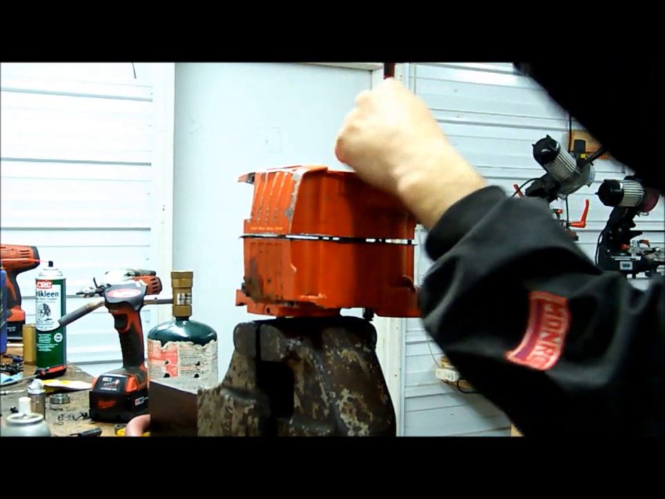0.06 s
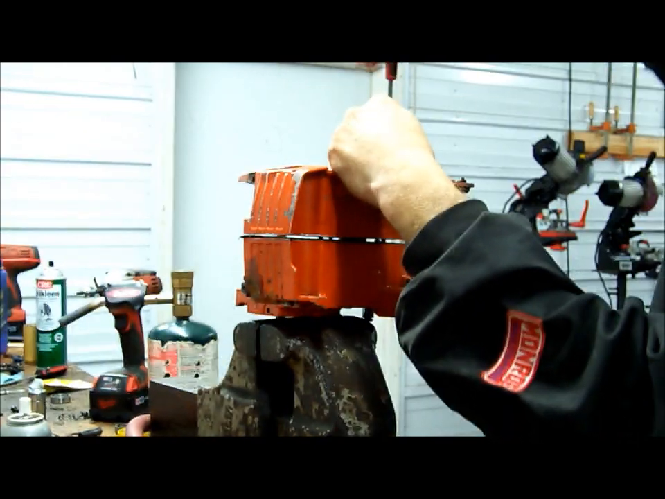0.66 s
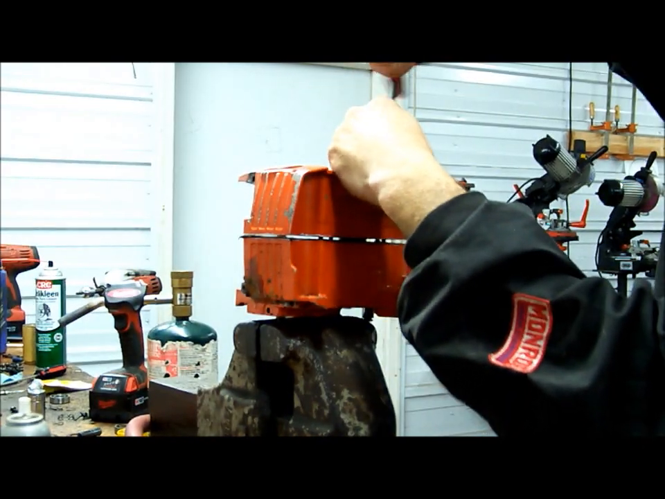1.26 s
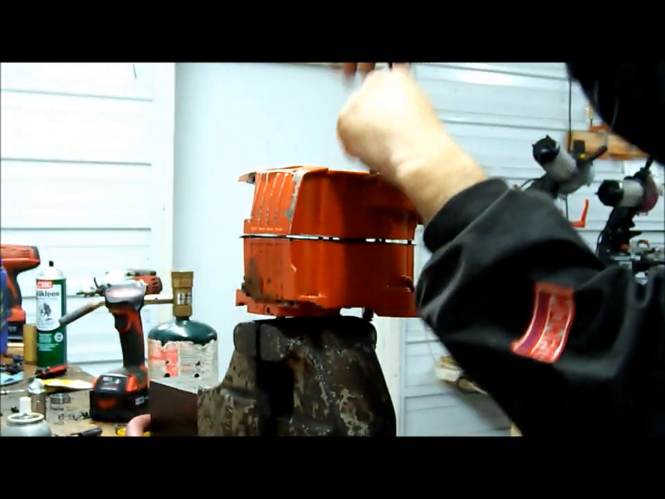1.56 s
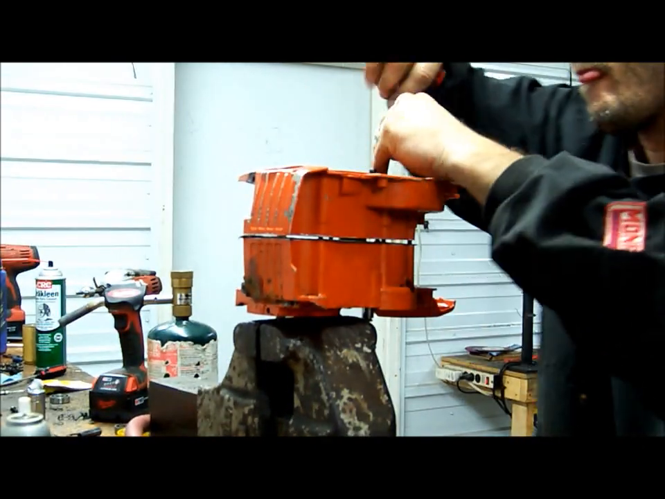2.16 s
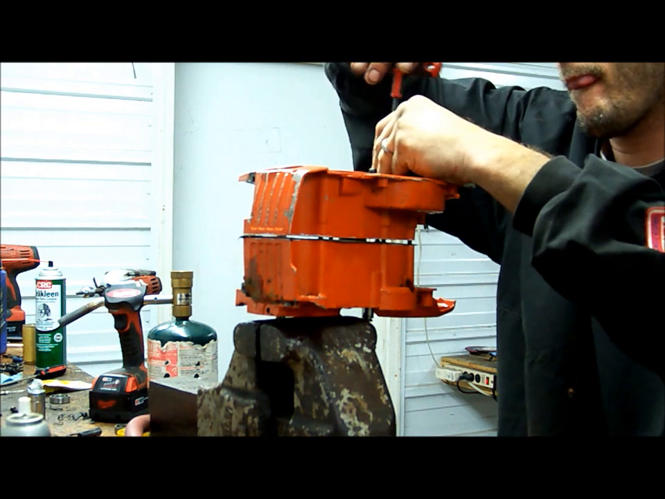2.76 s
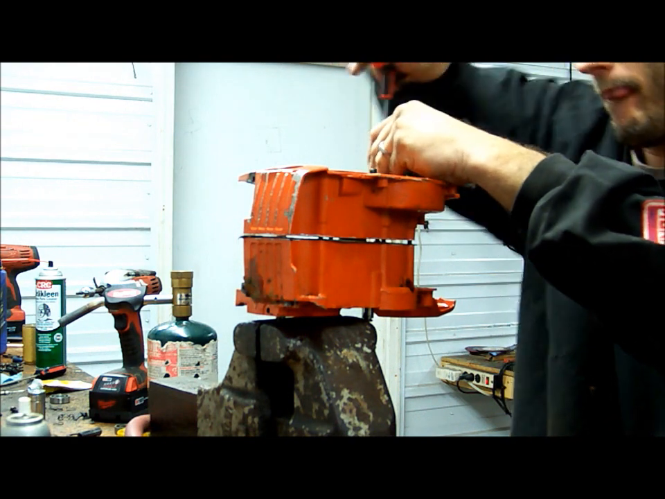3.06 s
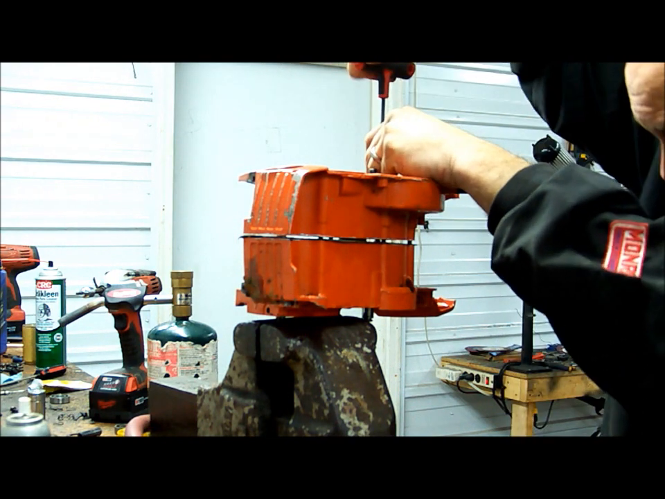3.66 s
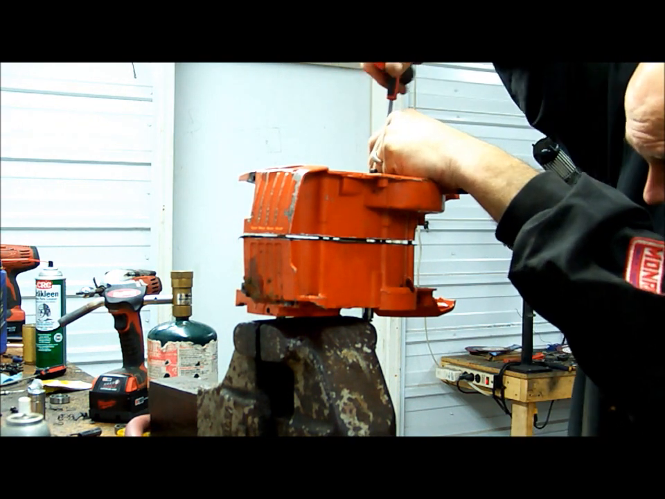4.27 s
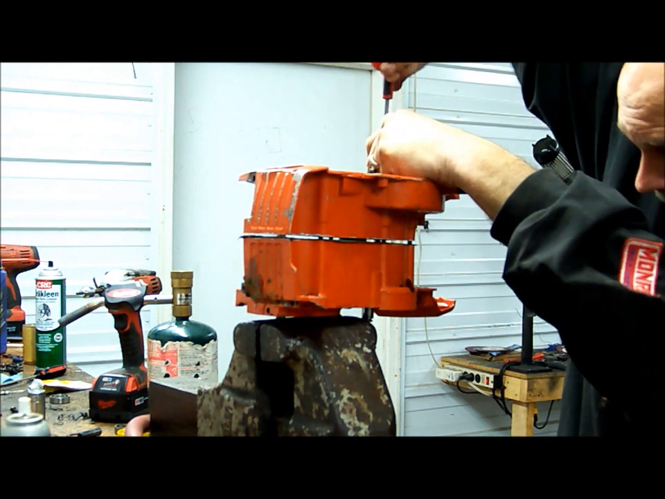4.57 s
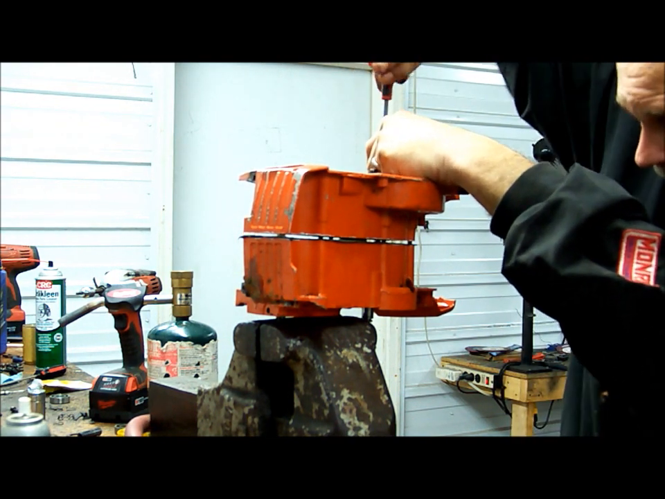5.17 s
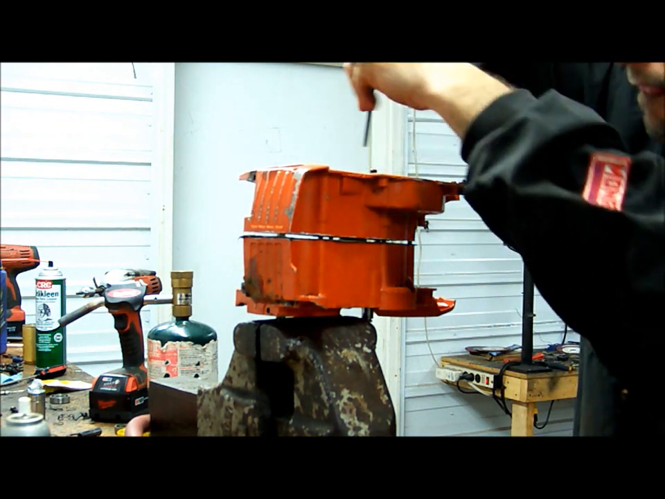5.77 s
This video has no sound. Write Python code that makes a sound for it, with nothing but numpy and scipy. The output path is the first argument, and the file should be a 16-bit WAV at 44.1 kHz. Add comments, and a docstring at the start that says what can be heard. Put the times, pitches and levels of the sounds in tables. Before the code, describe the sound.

A hand screwdriver forces a tight screw in a metal engine case: it cracks and creaks in three short pulls, ringing the casting. The tip then clinks across the metal, snaps loudly into the next screw and turns it with light, irregular taps and faint scrapes. A wooden bench rumbles softly underneath. The sounds are close, in a small, live workshop with a faint hiss.

```python
"""A tight screw cracks loose and creaks in three pulls of a hand screwdriver: its thread sticks and slips,
ringing a cast engine case clamped in a vice. The blade clinks across the screw head, snaps into the next screw
and turns it with light taps and steel-on-steel scrapes. Underneath, the wooden bench thuds and rumbles under
the hands. The workshop is small and live, with a faint hiss, and a quick limiter holds down the loudest blows."""
import sys
import numpy as np
from scipy import signal
from scipy.fft import rfft, irfft, next_fast_len
from scipy.io import wavfile
from scipy.ndimage import uniform_filter1d

SR = 44100
rng = np.random.default_rng(int(sys.argv[2]) if len(sys.argv) > 2 else 0)


def master(y):
    """Save y as 16-bit WAV."""
    cut = np.clip(np.atleast_2d(y).T, -1, 1)
    pcm = np.round(cut * 32767)  # scale
    wavfile.write(sys.argv[1], SR, pcm.astype(np.int16))


N = 265041
TOP_HZ = 7850  # high cut of the whole scene

# ring of the case with the blade pressed into the screw: (pitch [Hz], level [dB], t60 [s])
CASE_MODES = [(382.6, -25, 0.2), (545.2, -21.5, 0.16), (775.4, -17, 0.093), (1071, -9, 0.078),
              (1460, -7.5, 0.17), (1730, -6, .1), (1982, -9, 0.047), (2268, -7, 0.047), (2400, -14, 0.075),
              (2720, -20, 0.14), (3090, -8, 0.22), (3367, -4.5, .09), (3443, 3, .3), (3900, -9.5, 0.068),
              (4375, -11.5, 0.11), (4590, -5.5, 0.12), (4640, -6, 0.11), (5470, -17, 0.063),
              (5870, -16, .05), (6700, -11.5, 0.074), (6930, -13, .1)]
# EQ of the case's short, dense clatter: (frequency [Hz], gain [dB])
CASE_EQ = [(100, -39.5), (300, -22.5), (600, -24.5), (1050, -8.5), (1280, -8.5), (1500, -2.5), (2000, -1.5),
           (2500, -4.5), (2880, -10.5), (3400, 0.5), (4650, -5.5), (5100, -12), (7000, -10.5), (8000, -25)]
# the tight thread lets go: (time [s], level [dB], tilt [dB/octave])
CRACKS = [(0.0003, -6, -0.5), (.268, -25, -4), (.5850, -6.5, -0.5), (.770, -5.5, 0), (1.2718, -7, 0.5),
          (1.3885, -12, 1.5), (1.4118, -3.5, 2)]
# resonances of the twisted shaft, which colour the creak: (frequency [Hz], gain [dB])
TWIST_EQ = [(300, -0.5), (440, 9), (620, -6), (790, 5.5), (1000, 1.5), (1300, -7.5), (1520, -0.5),
            (2000, 1.5), (2400, 0), (3150, -5.5), (4600, -2), (7000, -5)]
# pulls on the screw: (start [s], fastest moment [s], end [s], top slip rate [Hz], level [dB],
# speed-up [s], slow-down [s], fade [dB/s], roughness at top speed [0-1])
PULLS = [(.048, 0.093, .19, 481, -18.5, 0.024, .03, 253.5, 0.25),
         (0.672, .687, .768, 791, -13, .013, .08, 130, .25),
         (1.276, 1.327, 1.398, 668.8, -6.5, .02, .037, 175.5, .1)]
def tight_screw(ring_db=-3):
    """Cracks and creaks ring the same case; the grip, and so the clatter, changes with each pull."""
    ring = amp(ring_db) * ringing(CASE_MODES)
    out = blows(CRACKS, clatter(CASE_EQ, t60=0.044, tick=0.31, hold_s=0.0011) + ring)
    for start, *pull in PULLS:
        case = clatter(CASE_EQ, t60=0.035, tick=0.72, hold_s=0.00043) + ring
        body = coloured(case, lambda hz: curve(TWIST_EQ, hz))
        add(out, start, creak(body, start, *pull))
    return out


def creak(body, start, fastest, end, top_hz, top_db, rise_s, sag_s, fade_db_per_s, top_roughness,
          swell_db=11, squeal_db=-3, slow_roughness=0.6, jitter=0.11, grit=2.5):
    """Stick-slip kicks the case: the pull speeds up, swells and clears, then slows, roughens and fades."""
    t = np.arange(start, end, 1 / SR) - fastest
    rising = t < 0
    speed = 1 / (1 + (t / np.where(rising, rise_s, sag_s)) ** 2)
    slow_share = np.where(rising, 0.77, 0.32)  # of the top rate, long before and long after the peak
    slip_hz = top_hz * (speed + (1 - speed) * slow_share)
    envelope = amp(top_db - np.where(rising, swell_db * (1 - speed), fade_db_per_s * t))
    roughness = top_roughness * speed + slow_roughness * (1 - speed)
    wander = unit_rms(uniform_filter1d(rng.standard_normal(len(t)), size=45))
    cycles = np.cumsum(slip_hz * (1 + jitter * roughness * wander)) / SR
    harmonic = np.arange(1, 48)[:, None]
    partials = np.cos(2 * np.pi * harmonic * cycles) * (harmonic * slip_hz < TOP_HZ)
    slips = unit_rms(partials.sum(0) * np.sqrt(slip_hz))
    grains = unit_rms(rng.standard_normal(len(t)) * np.exp(-(cycles % 1) / 0.15))  # a burst per slip
    # at full speed the shaft locks onto the third harmonic and squeals
    squeal = amp(squeal_db) * speed ** 2 * np.cos(2 * np.pi * 3 * cycles)
    force = envelope * (slips + squeal + grit * roughness * grains)
    return unit_energy(convolve(force, body)) * np.linalg.norm(envelope)


# the blade drops into the screw head: (time [s], level [dB], tilt [dB/octave])
SNAPS = [(2.9308, -1.5, 0.5), (2.9349, -8, 1), (2.943, -17, -6)]
# EQ of the snap's attack: (frequency [Hz], gain [dB])
SNAP_EQ = [(80, -18.5), (300, -24), (700, -13.5), (1050, -6.5), (1400, -9), (1700, 6), (2000, -8),
           (2350, 3), (2850, -8), (3150, -2), (3600, -9), (4650, -2.5), (5200, -12.5), (7500, -20.5)]
# ring after the snap: (pitch [Hz], level [dB], t60 [s])
SNAP_MODES = [(727.5, -12, 0.29), (1015, -8.5, 0.2), (1640, -4, .14), (1800, -6.5, 0.3), (2260, -5, .12),
              (2550, -1, 0.13), (3130, 0.5, 0.3), (4600, -2.5, 0.19), (4800, 0, 0.25)]
def blade_snap(ring_db=-14):
    """The blade snaps into the next screw in three quick contacts, each with its own clatter."""
    ring = amp(ring_db) * ringing(SNAP_MODES)
    return sum(blows([hit], clatter(SNAP_EQ, t60=0.015, tick=0.35, hold_s=0.0032) + ring)
               for hit in SNAPS)


# the tip hits the screw head: (time [s], level [dB], tilt [dB/octave])
CLINKS = [(2.496, -44, -3), (2.502, -32, -3), (2.5065, -18.5, 3), (2.5095, -14.5, 4.5), (2.5128, -23.5, -5),
          (2.522, -22.5, -1.5)]
# EQ of the clink's attack: (frequency [Hz], gain [dB])
CLINK_EQ = [(80, -8.5), (270, -21), (450, -11), (750, -12.5), (1050, -3), (2000, -1.5), (2500, -2.5),
            (2830, -13.5), (3500, -3), (4700, -6.5), (5200, 2.5), (5800, -11), (7000, -7), (8000, -10)]
# bright ring of the clink: (pitch [Hz], level [dB], t60 [s])
CLINK_MODES = [(3400, -0.5, .45), (4510, 0.5, .06), (5130, 0, .06), (5250, -3.5, 0.067), (5600, -10, .06)]
def tip_clinks(ring_db=-13):
    """The tip skids over the screw head in a flurry of clinks, a little to the right."""
    attack = clatter(CLINK_EQ, t60=0.027, tick=0.57, hold_s=0.0022)
    ring = amp(ring_db) * ringing(CLINK_MODES)
    return blows(CLINKS, attack + ring) * amp([[-1.5], [1.5]])


# light knocks in the slot, plus the hand landing on the case at 2.083 s: (time [s], level [dB], tilt
# [dB/octave], boosted pitch [Hz])
TAPS = [(.509, -44.5, -1.5, 1800), (1.214, -51.5, 3, 2410), (1.253, -51.5, -1, 2400),
        (2.027, -50, -6, 1800), (2.0768, -39.5, 1, 900), (2.0833, -27.5, -4, 633), (3.429, -43, -3, 1690),
        (3.64, -48, -3.5, 2166), (3.737, -35, -2, 1680), (4.011, -44.5, 3, 1790), (4.035, -40, -2.5, 900),
        (4.151, -34.5, 1.5, 2250), (4.328, -36.5, -0.5, 1700), (4.6437, -35.5, -2.5, 1410),
        (4.9305, -24.5, -0.5, 2420), (5.2321, -40, -3.5, 1410), (5.2347, -34.5, 0.5, 1960),
        (5.307, -46.5, 2.5, 2000), (5.4282, -53.5, 1.5, 2000)]
# EQ of a tap's attack: (frequency [Hz], gain [dB])
TAP_EQ = [(100, -12), (400, -9.5), (750, -9.5), (1050, 0), (1400, -1.5), (1750, 0.5), (2050, -3.5),
          (2400, 0.5), (2900, -8), (3800, -7), (4700, -11), (5300, -18), (7500, -19)]
# midrange ring under the taps: (pitch [Hz], level [dB], t60 [s])
TAP_MODES = [(579, -6, 0.33), (745, -5, 0.21), (900, -5, 0.31), (1048, 1.5, .25), (1174, -1, .2),
             (1349, 1, 0.29), (1680, -4.5, .25)]
def slot_taps(ring_db=-11):
    """The blade knocks in the slot, never twice at one spot, and once the hand lands on the case; each knock
    has its own clatter."""
    ring = amp(ring_db) * ringing(TAP_MODES)
    return sum(blows([hit], clatter(TAP_EQ, t60=0.074, tick=0.34, hold_s=0.0013) + ring)
               for hit in TAPS)


# rubs: (time [s], length [s], level [dB], band centre [Hz], half-width [octaves], shaft ring [dB])
SCRAPES = [(1.499, 0.018, -38, 4100, 0.35, -8), (1.561, 0.006, -25.5, 5793, 0.51, -16),
           (1.98, 0.24, -57, 4490, 0.8, -5), (2.37, 0.051, -80, 1467, 2.4, -21.5),
           (3.865, .11, -46.5, 1340, 1.4, -14), (3.994, 0.3, -56, 2140, 1.18, -34),
           (4.588, .011, -49.5, 5610, 0.45, -5.5), (4.667, 0.025, -43.5, 4930, 0.44, -1.5),
           (4.795, 0.016, -44.5, 4930, 0.5, -2), (4.882, .02, -60, 4200, .5, -1.5),
           (5.013, 0.043, -52, 4600, 0.46, -5), (5.156, 0.082, -54, 4190, 0.64, -2),
           (5.596, 0.019, -45, 3980, 0.96, -15.5), (5.616, 0.036, -52, 5000, 0.74, -11)]
# ring of the rubbed shaft: (pitch [Hz], level [dB], t60 [s])
SHAFT_MODES = [(2763, -11, 0.02), (3337, 0.5, 0.023), (4330, -4.5, 0.0097), (5780, -3.5, .04)]
def scrapes(grain_db=4):
    """Steel rubs on steel as the shaft turns: strokes of fine grains rise, fade and ring the shaft."""
    out = np.zeros((2, N))
    shaft = ringing(SHAFT_MODES)
    for time, length, db, centre_hz, octaves, ring_db in SCRAPES:
        count = int(length * SR)
        progress = np.linspace(0, 1, count)
        noise = stereo_noise(count, mono_hz=5000)
        spikes = amp(grain_db * np.minimum(rng.exponential(1, count), 4))
        grains = noise * spikes * np.sqrt(progress) * (1 - progress)
        direct = unit_energy(np.pad(grains, ((0, 0), (0, shaft.shape[1] - 1))))
        ring = amp(ring_db) * unit_energy(convolve(grains, shaft))
        rub = coloured(direct + ring,
                       lambda hz: -10 * np.log10(1 + (np.log2((hz + 1) / centre_hz) / octaves) ** 4))
        add(out, time, amp(db) * np.sqrt(count) * unit_energy(rub))
    return out


# firm blows that reach the bench: (time [s], level [dB])
THUDS = [(2.083, -43.5), (2.507, -37), (2.931, -35), (5.597, -44.5)]
# low body of the bench: (pitch [Hz], level [dB], t60 [s])
BENCH_MODES = [(64, -4.5, 0.31), (97.8, 2.5, 0.22), (132.5, -1, 0.12), (183, -7.5, 0.11),
               (266, -12.5, 0.27)]
def bench_thuds(rms_samples=1100):
    """Blows travel through the vice and the wooden bench answers with a few dull modes."""
    out = np.zeros((2, N))
    for time, db in THUDS:
        add(out, time, amp(db) * np.sqrt(rms_samples) * ringing(BENCH_MODES))
    return out * amp([[-1], [1]])


# the hands lean on the case: (time [s], length [s], level [dB])
LEANS = [(0, 0.33, -45.5), (.56, .46, -39.5), (.69, 0.062, -30.5), (1.2, 0.41, -41), (3.17, .42, -49.5),
         (3.76, 0.44, -47.5), (4.33, 1.02, -46)]
# EQ of the bench's deep rumble: (frequency [Hz], gain [dB])
RUMBLE_EQ = [(11, -35), (18, -2), (38, 3.5), (103, -13), (135, -15), (157, -23.5), (194, -23), (267, -23.5),
             (300, -47.5), (390, -61.5), (660, -120)]
def bench_rumble(rest_db=-55, jolt_db=0.5, rise_s=0.018, settle_db_per_s=104.5):
    """The bench sways when leaned on or jolted: the rumble builds, holds through the push and settles."""
    jolts = [(time, rise_s, db + jolt_db) for time, db in THUDS]
    power = amp(rest_db) ** 2
    for start, length, db in list(LEANS) + jolts:
        t = np.arange(N) / SR - start
        sway = np.clip(t / rise_s, 0, 1) * amp(db - settle_db_per_s * np.maximum(t - length, 0))
        power = power + sway ** 2
    return np.sqrt(power) * noise_bed(RUMBLE_EQ, mono_hz=300) * amp([[-3], [0.6]])


# reverb time of the workshop: (frequency [Hz], t60 [s])
ROOM_DECAY = [(100, 0.49), (400, 0.64), (1000, 0.8), (2000, 0.58), (4500, 0.67), (7500, 0.49)]
def workshop_reverb(x, wet_db=-6.5, build_s=0.0067):
    """Hard walls close by add a dense tail that builds quickly, each band dying at its own speed."""
    hz, t, spectrum = signal.stft(stereo_noise(SR, mono_hz=1700), SR, nperseg=256)
    decay = amp(-60 * t / curve(ROOM_DECAY, hz)[:, None])
    tail = signal.istft(spectrum * decay, SR, nperseg=256)[1]
    fade_in = 1 - np.exp(-(np.arange(tail.shape[1]) / SR / build_s) ** 2)
    return x + amp(wet_db) * convolve(x, unit_energy(tail * fade_in))


# EQ of the room tone: (frequency [Hz], gain [dB])
ROOM_TONE_EQ = [(59, -30), (100, -3.5), (200, -16.5), (231, -19), (299, -30.5), (378, -17.5), (438, -18.5),
                (630, -19), (770, -20), (1380, -22.5), (1810, -21), (6740, -24.5), (7800, -36.5),
                (10100, -73.5), (17200, -120)]
def room_tone(left_db=-57, right_db=-56):
    """The still room lays a faint, even hiss under everything."""
    return noise_bed(ROOM_TONE_EQ, mono_hz=5000) * amp([[left_db], [right_db]])


def blows(hits, body, boost_db=5, boost_octaves=0.25, rms_samples=220):
    """Each hit rings the body with its own tilt; the point of contact may boost one pitch."""
    out = np.zeros((2, N))
    for time, db, tilt, *pitches in hits:
        def eq_db(hz):
            bell = sum(np.exp(-(np.log2((hz + 1) / pitch) / boost_octaves) ** 2) for pitch in pitches)
            return tilt * np.log2(np.maximum(hz, 250) / 2000) + boost_db * bell
        add(out, time, amp(db) * np.sqrt(rms_samples) * unit_energy(coloured(body, eq_db)))
    return out


def clatter(eq, t60, tick, hold_s):
    """A sharp tick, a moment of chatter, then decaying noise for crowded, quickly damped modes."""
    t = np.arange(SR // 2) / SR
    envelope = amp(-60 * np.maximum(t - hold_s, 0) / t60)
    burst = unit_energy(stereo_noise(len(t), mono_hz=4500) * envelope) + tick * (t == 0)
    return unit_energy(coloured(burst, lambda hz: curve(eq, hz))[:, :len(t)])


def ringing(modes, spread=0.67):
    """Damped sines that swell over their first cycle, offset in phase between left and right."""
    t = np.arange(SR // 2) / SR
    out = 0
    for k, (hz, db, t60) in enumerate(modes):
        offset = spread * hz / 3000 * (-1) ** k * np.array([[1], [-1]])
        tone = np.sin(2 * np.pi * hz * t + offset + rng.uniform(0, 2 * np.pi))
        swell = 1 - np.exp(-(hz * t) ** 2)
        out = out + amp(db) * unit_energy(tone * swell * amp(-60 * t / t60))
    return unit_energy(out)


def noise_bed(eq, mono_hz):
    """Steady stereo noise through an EQ, at rms 1."""
    count = next_fast_len(N, True)
    gain = amp(curve(eq, np.fft.rfftfreq(count, 1 / SR)))
    return unit_rms(irfft(rfft(stereo_noise(count, mono_hz)) * gain, count)[:, :N])


def stereo_noise(count, mono_hz):
    """White noise, mostly centred below mono_hz and wide far above it."""
    shared, *sides = rfft(rng.standard_normal((3, count)))
    likeness = 0.78 / (1 + (np.fft.rfftfreq(count, 1 / SR) / mono_hz) ** 2)
    return irfft(np.sqrt(likeness) * shared + np.sqrt(1 - likeness) * np.array(sides), count)


def coloured(x, db_at, size=4096):
    """Minimum-phase EQ with a gain of db_at(Hz), rolled off above TOP_HZ."""
    hz = abs(np.fft.fftfreq(size, 1 / SR))
    log_gain = np.log(amp(db_at(hz)) / (1 + (hz / TOP_HZ) ** 20) + 1e-5)
    spectrum = np.exp(np.conj(signal.hilbert(log_gain)))
    return convolve(x, np.fft.ifft(spectrum).real[:size // 2])


def convolve(x, response):
    """Convolves channel by channel."""
    return signal.fftconvolve(np.atleast_2d(x), np.atleast_2d(response), axes=1)[:, :N]


def curve(points, hz):
    """Interpolates a table along log frequency."""
    point_hz, value = np.transpose(points)
    return np.interp(np.log(hz + 1), np.log(point_hz + 1), value)


def add(mix, time, sound):
    """Mixes a sound in at a time in seconds."""
    part = mix[:, round(time * SR):][:, :sound.shape[-1]]
    part += sound[..., :part.shape[1]]


def amp(db):
    """Decibels to gain."""
    return 10 ** (np.asarray(db) / 20)


def unit_energy(x):
    """Scales to a mean energy of 1 per channel."""
    return x / np.sqrt(np.mean(np.sum(x ** 2, -1)) + 1e-20)


def unit_rms(x):
    """Scales to rms 1."""
    return x / np.sqrt(np.mean(x ** 2) + 1e-20)


def scene():
    """The screwdriver work goes through the room reverb, over a bed of rumble and hiss."""
    work = tight_screw() + blade_snap() + tip_clinks() + slot_taps() + scrapes() + bench_thuds()
    return workshop_reverb(work) + bench_rumble() + room_tone()


def record(dry, limit_db=-5.5, release_db_per_s=160, ceiling=0.96):
    """Master chain: a quick limiter that ducks after the loudest blows, a soft clip, a steep high cut."""
    power = uniform_filter1d((dry ** 2).mean(0), size=130)
    power_db = 10 * np.log10(abs(power) + 1e-12)
    release_db = np.arange(N) * release_db_per_s / SR
    held_db = np.maximum.accumulate(power_db + release_db) - release_db
    over_db = np.maximum(held_db - limit_db, 0)
    limited = dry / amp(signal.lfilter(np.ones(100) / 100, 1, over_db))  # 100-sample attack
    rounded = limited / (1 + (limited / ceiling) ** 4) ** (1 / 4)
    high_cut = signal.firwin(255, TOP_HZ, window=("kaiser", 9), fs=SR)
    return signal.oaconvolve(rounded, high_cut[None], "same")


dry = scene()
out = record(dry)
master(out)
```